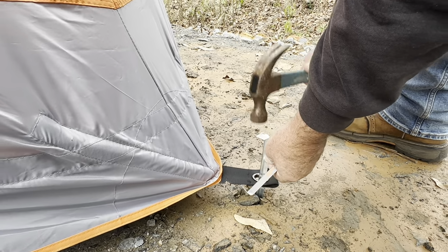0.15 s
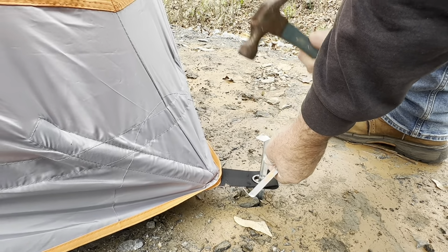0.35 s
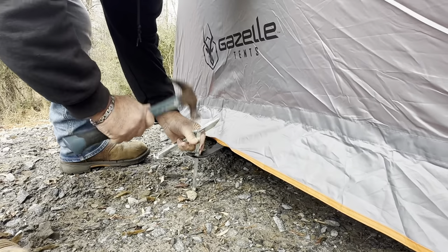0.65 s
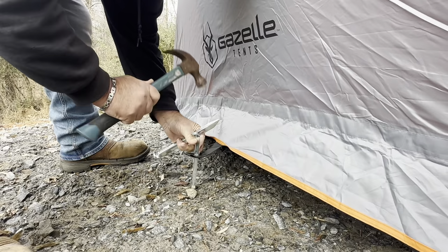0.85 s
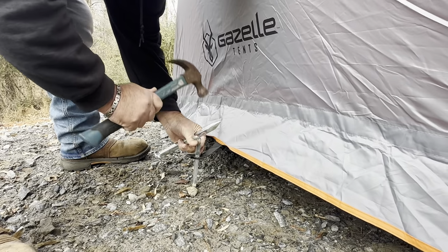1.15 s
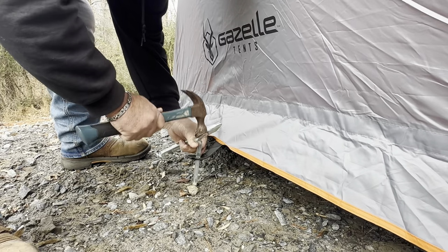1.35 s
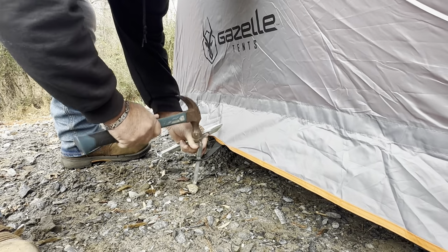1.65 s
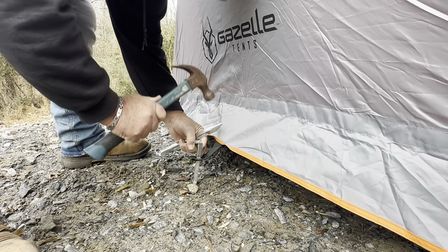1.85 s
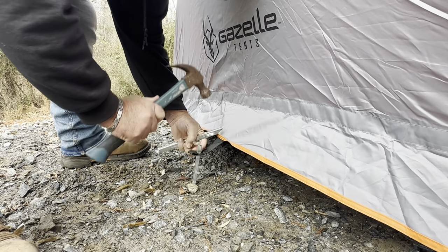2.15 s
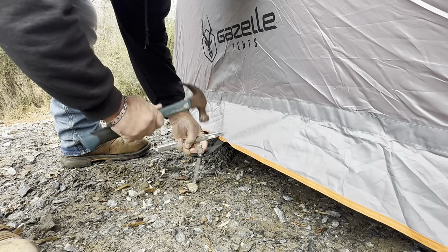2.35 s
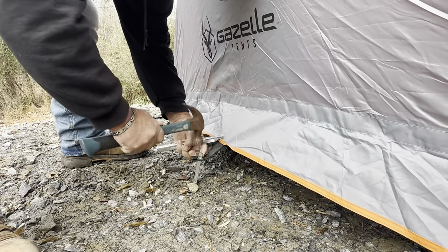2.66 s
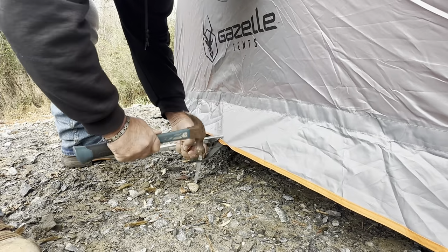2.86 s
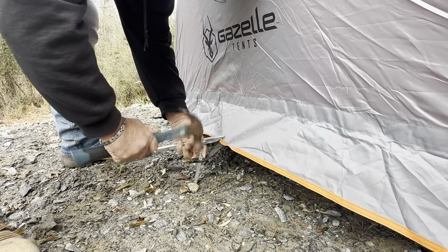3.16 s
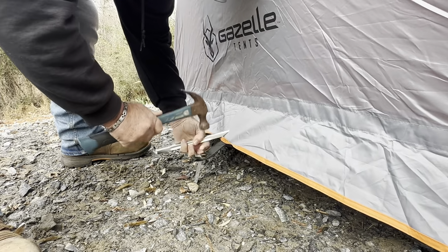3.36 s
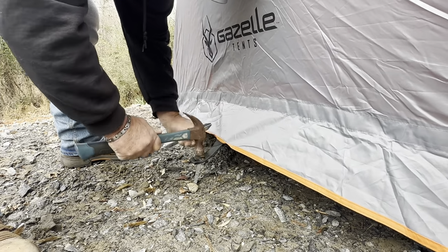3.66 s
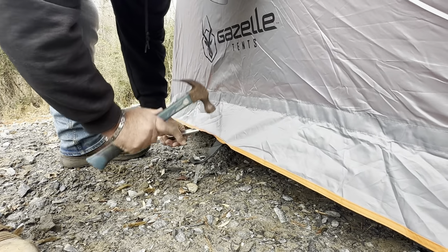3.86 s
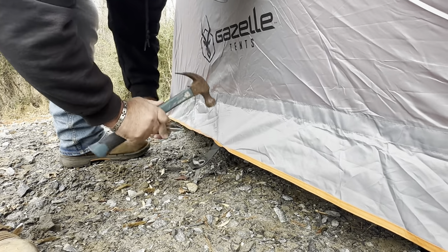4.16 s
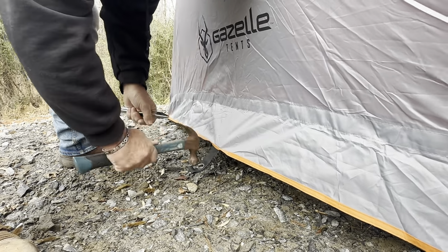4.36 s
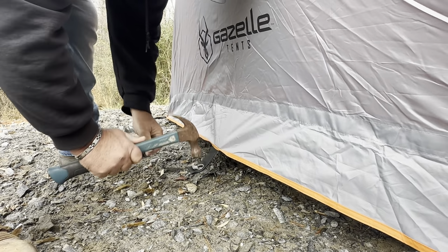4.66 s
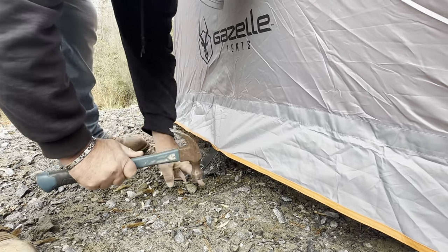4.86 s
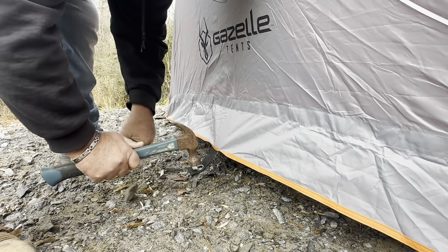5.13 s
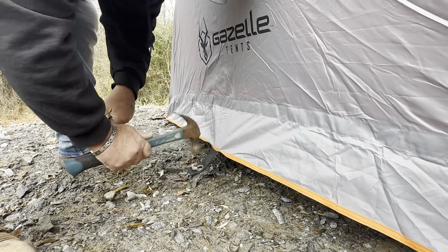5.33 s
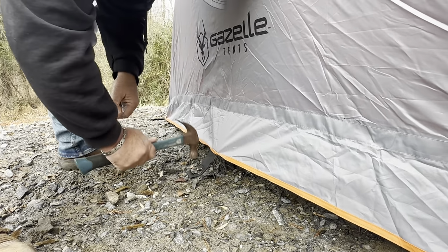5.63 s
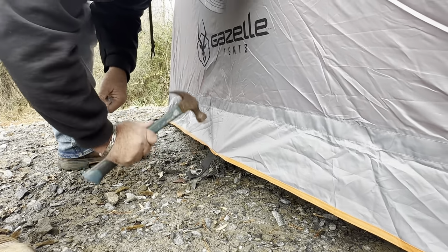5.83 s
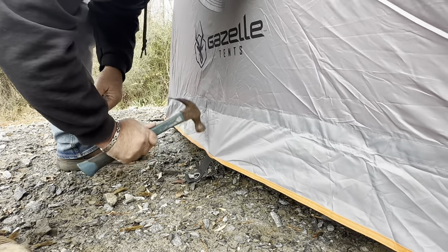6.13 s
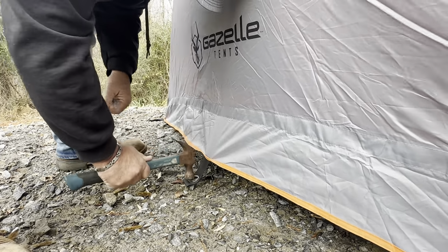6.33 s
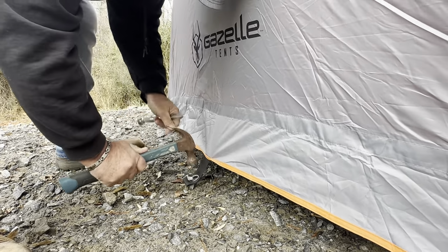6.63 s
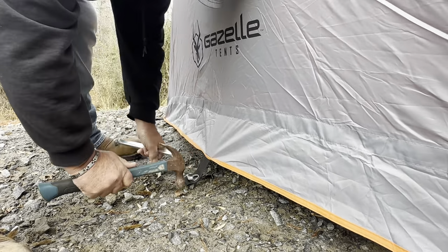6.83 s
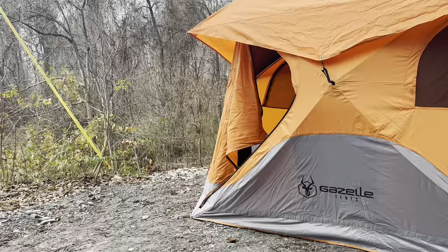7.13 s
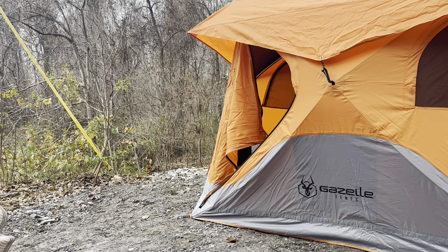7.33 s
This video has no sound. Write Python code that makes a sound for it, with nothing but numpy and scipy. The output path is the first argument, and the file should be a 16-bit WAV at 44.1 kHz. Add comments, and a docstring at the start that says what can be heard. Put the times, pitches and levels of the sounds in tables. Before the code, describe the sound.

Outdoors, very close to the ground, with quiet open air and a faint distant road rumble throughout. A hammer cracks onto a steel stake at 0.0 s, followed by a tiny dropout near 0.4 s as the next blow lands. Sharp, bright clanks continue about every 0.3 s until 3.2 s, varying in pitch and force, strongest near 1.0 and 1.9 s, each with brief ringing steel and a short grainy reflection. Slightly slower blows at 3.6, 3.9 and 4.3 s bring more low thud. Hammering pauses; around 4.9 to 5.3 s there are faint scrapes and gravel ticks, one crisp at 5.1 s. Three heavier blows at 5.5, 5.9 and 6.3 s combine clank with deep soil thump. Their tails fade, a brief dip comes at 6.9 s, then soft fabric hiss, a dull stone knock at 7.3 s and a low engine-like drone to 7.5 s.

```python
"""Driving a tent stake

Close by, outdoors, a claw hammer drives a steel stake into gravel beside a two-port microphone.
Each blow is a noisy crack with damped sines, ringing steel, a noise tail back off tent and trees,
and a slow falling swing through the soil. Gravel ticks are resonant noise bursts, scrapes snapping hiss.
Shaped noise makes the distant road; near the end fabric hisses in the wind over a low droning sine."""
import sys
import numpy as np
from scipy import signal
from scipy.fft import rfft, irfft
from scipy.io import wavfile
from scipy.ndimage import uniform_filter1d

SR = 44100
rng = np.random.default_rng(int(sys.argv[2]) if len(sys.argv) > 2 else 0)


def dump_mix(stems):
    """Bounce the given channels to the path in sys.argv[1] as a 16-bit WAV at rate SR."""
    frames = np.atleast_2d(stems).T  # one column per channel
    limited = np.clip(frames, -1, 1)  # hard clip at full scale
    pcm = np.round(limited * 32767).astype(np.int16)
    wavfile.write(sys.argv[1], SR, pcm)


N = 330305

# Levels are those in the mix, ahead of record().
# Far road and open air. Each row: frequency in Hz, relative density in dB per Hz.
AIR_COLOUR = [(20, -45), (40, -16), (72, -1.5), (156, -22), (237, -22.5), (297, -26), (465, -23),
              (994, -22), (2300, -35), (3300, -45.5), (7000, -46.5), (7800, -51.5), (15600, -65.5),
              (16000, -91.5)]
# Loudness of the air. Each row: time in seconds, level in dB.
AIR_LEVEL = [(0.0, -51), (7.49, -48.5)]
# Likeness of the air at the two ports. Each row: frequency in Hz, likeness from -1 to 1.
AIR_LIKENESS = [(60, .95), (150, .91), (380, .15), (950, -.3), (2400, -.35), (6000, 0), (15000, .45)]

# Hammer blows. Each row: start in seconds, crack level in dB, loudest clang in Hz, clang in dB and
# treble in dB (both relative to the crack), soil thud in dB, head ring in dB, lingering band in Hz.
BLOWS = [(0.0054, -16.5, 4500, 0.5, -0.5, -18.5, -40.5, 4650),
         (0.388, -18, 5360, -4.5, -2.5, -27, -46, 3250), (0.6758, -17.5, 3635, -5, 2.5, -29.5, -54, 3630),
         (0.975, -13.5, 3117, -1, -1, -32, -52.5, 3090), (1.269, -16, 5600, -3.5, 0, -32, -46.5, 2980),
         (1.577, -16.5, 5440, -4, 4, -29, -46, 3400), (1.9318, -12.5, 4080, -3.5, -0.5, -31.5, -46.5, 3460),
         (2.2256, -16.5, 4200, -3.5, -0.5, -30, -48.5, 4250),
         (2.539, -18.5, 5030, -0.5, 6, -31, -47.5, 2940), (2.863, -15, 5550, -1.5, 0, -32, -49, 3520),
         (3.1726, -19.5, 5570, 1.5, 6.5, -34, -49.5, 3470),
         (3.5775, -18, 5800, 5, -1.5, -28.5, -51.5, 5540), (3.923, -16, 4610, -3, 2, -17.5, -54.5, 4530),
         (4.2894, -17.5, 3370, 1.5, 3.5, -15, -44.5, 4900), (5.5107, -15, 5560, -4, -5, -16, -48, 5520),
         (5.9, -17, 3060, -10, 1, -11.5, -42, 1660), (6.2742, -17.5, 4300, 3, 1.5, -10, -44, 1686)]
# Noise of the steel contact. Each row: frequency in Hz, relative density in dB per Hz.
CRACK_COLOUR = [(500, -28.5), (1700, -12), (2900, 1), (3900, 0.5), (4700, -6), (5600, -7.5), (7500, -6.5),
                (9800, -5.5), (11400, -3.5), (12200, -13.5), (15400, -4.5), (16200, -15)]
# Hand-damped modes of the contact. Each row: frequency in Hz, relative level in dB, t60 in seconds.
CLANG_MODES = [(2070, -18.5, 0.032), (3220, -11, 0.082), (4640, -4.5, 0.023), (5120, -13, 0.046),
               (6700, -13.5, 0.036), (6900, -12.5, 0.098), (7160, -14, 0.014), (8200, -20, 0.047),
               (10660, -4.5, 0.014), (10800, -3, 0.0052), (12400, -24, 0.022), (13980, -17, 0.011)]
# Hammer head, a close pair that beats, and the claw's short ping.
# Each row: frequency in Hz, relative level in dB, t60 in seconds.
HEAD_MODES = [(6515, -1, 0.45), (6508, -8, .45), (4265, 12, .07)]
# Ringing stake. Each row: frequency in Hz, relative level in dB, t60 in seconds.
STAKE_MODES = [(1426, -3.5, 0.43), (2340, -3.5, 0.15), (3500, -4, 0.23), (4330, 2, 0.48),
               (5230, -1.5, 0.18), (5060, -11.5, 0.55), (8100, -18.5, 0.28), (10100, -15.5, 0.43)]
# Colour of the way back from tent, ground and trees. Each row: frequency in Hz, relative level in dB.
SCATTER_COLOUR = [(400, -8), (1200, 0), (2000, 6.5), (3000, -0.5), (5600, -1.5), (7000, -3), (10000, -8.5),
                  (15000, -11.5)]
# Fading of the way back. Each row: frequency in Hz, t60 in seconds.
SCATTER_T60 = [(300, 0.66), (1500, 0.26), (3000, 0.41), (6000, 0.42), (10000, 0.41), (16000, 0.12)]
# The soil after a blow. Each row: frequency in Hz, relative density in dB per Hz.
RUMBLE_COLOUR = [(30, -12.5), (70, 5), (130, 2), (250, -10.5), (500, -20.5), (1000, -28), (2500, -62.5),
                 (6000, -92.5)]
# Port phase for sound from the stake. Each row: frequency in Hz, radians by which left leads.
PORT_PHASE = [(0, 0), (1700, 2.9), (3500, 3.1), (4000, 4.2), (6000, 5.2), (7300, 9.2), (8200, 8.3),
              (9000, 6.6), (9500, 7.4), (11500, 6.5), (16500, 3.9)]
# Port balance for sound from the stake. Each row: frequency in Hz, left over right in dB about the pan.
PORT_BALANCE = [(500, 0), (1200, 1), (2800, -1.5), (5500, 3.5), (9500, -3), (14000, -1.5)]

# Gravel ticks. Each row: start in seconds, level in dB, centre in Hz, pan in dB to the left.
TICKS = [(1.6144, -32.5, 7200, 3), (3.2294, -61, 6520, 7), (4.2243, -54, 3820, 4), (4.9541, -40.5, 7150, 2),
         (5.0, -35.5, 7460, 1), (5.0888, -22.5, 9900, 1.5), (5.1344, -59, 9870, 1.5),
         (5.1542, -52, 10100, 6), (5.2205, -47, 3660, 7), (5.2629, -37, 3630, 16.5), (5.296, -54, 3980, 8),
         (5.3444, -54.5, 4150, 16), (5.975, -46, 2990, 1), (6.045, -58, 5000, 3), (6.222, -59, 4500, 2),
         (7.2194, -59, 4690, 4), (7.3282, -49, 9540, 5)]
# Dull knocks. Each row: start in seconds, level in dB, centre in Hz, pan in dB to the left.
KNOCKS = [(3.19, -31, 170, 1), (5.088, -41, 600, 7), (5.15, -43.5, 170, 1), (5.262, -39, 350, 3),
          (7.174, -43, 720, 10), (7.282, -25.5, 620, 7), (7.309, -41, 762, 3)]
# Hiss of scrapes and fabric. Each row: frequency in Hz, relative density in dB per Hz.
RUSTLE_COLOUR = [(1470, -3), (2500, -1.5), (4480, -4), (5730, -8), (6500, -3), (8430, -5.5), (9650, -1.5),
                 (14800, -12.5), (16100, -5), (16500, -57)]
# A boot scrapes the gravel. Each row: start in seconds, swell in seconds, hold in seconds, level in dB.
SCRAPES = [(3.216, .004, 0.2, -68), (4.913, 0.045, 0.031, -53.5), (5.087, 0.0057, 0.0033, -45.5)]
# Wind shakes the tent. Each row: time in seconds, level in dB.
FABRIC = [(6.915, -65.5), (6.937, -57), (7.089, -59.5), (7.279, -55.5), (7.49, -66)]
# Brief dips in the level. Each row: centre in seconds, half width in seconds.
DIPS = [(0.41, 0.029), (6.907, 0.027)]

DEEP_DB = -10  # thud level of a blow on the sunk stake
KNOCK_DB, KNOCK_FOLLOWS = -12.5, 0.61  # level at a deep blow, dB per dB of thud
KNOCK_HZ = 1560
SCATTER_DB, SCATTER_FOLLOWS = -42.5, 0.1  # level at a deep blow, dB per dB of thud
LINGER_DB, LINGER_WIDTH_HZ = 8, 140
THUD_DELAY_S, THUD_HASTE = .014, 0.00017  # delay at a deep blow, s sooner per dB of thud
STAKE_RING_DB = -45  # relative to the crack
STAKE_PAN_DB = 0.3

TICK_WIDTH_HZ, TICK_T60_S = 1530, 0.022
KNOCK_WIDTH_HZ, KNOCK_T60_S = 820, 0.053
BODY_HZ, BODY_DB = 3790, -5.5  # stony body under the ticks centred above 3.8 kHz
MIN_CYCLES = 28  # the t60 of low knocks is stretched to this many cycles
SCRAPE_FADE_S = 0.045
DRONE_S, DRONE_SWELL_S, DRONE_DB, DRONE_HZ = 7.08, 0.15, -43, 58.5
DRONE_WAVER_DB, DRONE_WAVER_HZ, DRONE_WAVERS_PER_S = 1.5, .6, 9
EDGE_HZ = 16400  # upper band limit


def amp(db):
    """Amplitude factor of a level in dB."""
    return 10 ** (np.asarray(db) / 20)


def evened(x):
    """Scale to an rms of one."""
    return x / np.sqrt(np.mean(x ** 2) + 1e-20)


def read(points, hz):
    """Read a frequency table along a logarithmic axis."""
    f, value = np.transpose(points)
    return np.interp(np.log(hz + 1), np.log(f + 1), value)


def add(mix, s, sound):
    """Mix a sound in at s seconds, cut off at the end of the mix."""
    part = mix[..., round(s * SR):][..., :sound.shape[-1]]
    part += sound[..., :part.shape[-1]]


def panned(x, pan_db):
    """Left over right by pan_db."""
    return x * amp([[pan_db / 2], [-pan_db / 2]])


def coloured(x, db):
    """Filter by a level curve in dB over Hz."""
    hz = np.fft.rfftfreq(x.shape[-1], 1 / SR)
    return irfft(rfft(x) * amp(db(hz)), x.shape[-1])


def rings(modes, t, detune, spread_db):
    """Dying sines with fresh phases; every blow lands a little differently."""
    hz, db, t60 = np.transpose(modes)[:, :, None]
    lift, shift, phase = rng.random((3, len(hz), 1))
    level = amp(db + spread_db * lift - 60 * t / t60)
    turns = hz * (1 + detune * (shift - .5)) * t + phase
    return (level * np.sin(2 * np.pi * turns)).sum(0)


def field(gain, likeness, phase, size):
    """Stereo noise from a gain map over Hz and s, with likeness and phase between the ports."""
    hop = size // 4
    frames, hz = N // hop + 5, np.fft.rfftfreq(size, 1 / SR)
    a, b, c, d = rng.standard_normal((frames, len(hz), 4)).T
    same = np.clip(likeness(hz), -1, 1)[:, None]
    left, other = a + 1j * b, c + 1j * d
    right = same * left * np.exp(-1j * phase(hz))[:, None] + np.sqrt(1 - same ** 2) * other
    spectra = np.array([left, right]) * gain(hz[:, None], np.arange(frames) * hop / SR)
    return signal.istft(spectra, nperseg=size, noverlap=size - hop)[1][:, :N]


def air():
    """Far road rumble and open-air wash: shaped noise in drifting patches of time and pitch."""
    def gain(hz, t):
        grain = rng.standard_normal((len(t), len(hz))).T
        patches = evened(uniform_filter1d(uniform_filter1d(grain, 6, 0), 8, 1))
        return amp(read(AIR_COLOUR, hz) + 2.0 * patches)
    wash = evened(field(gain, lambda f: read(AIR_LIKENESS, f), lambda f: 0 * f, size=2048))
    return wash * amp(np.interp(np.arange(N) / SR, *np.transpose(AIR_LEVEL)))


def crack(clang_hz, clang_db, treble_db):
    """A few milliseconds of chattering steel contact, one clang standing out, and damped modes."""
    t = np.arange(2048) / SR
    middle, bright, side = rng.standard_normal((3, len(t)))
    # below the treble each port hears its own near reflections
    ports_noise = middle + .5 * side * np.array([[1], [-1]])
    body = coloured(ports_noise, lambda f: read(CRACK_COLOUR, f) - 40 * (f > 7600))
    treble = coloured(bright, lambda f: read(CRACK_COLOUR, f) - 40 * (f < 7600))
    hold = np.minimum(t / 0.0022, 1) * amp(-60 * np.maximum(t - .004, 0) / 0.011)
    chatter = (evened(body) + amp(treble_db) * evened(treble) * amp(-60 * t / 0.05)) * hold
    clang = np.sin(2 * np.pi * clang_hz * t) * (t / .0025) * np.exp(1 - t / 0.002)
    damped = rings(CLANG_MODES, t, detune=0.029, spread_db=7) * np.minimum(t / 0.003, 1)
    return 1.17 * chatter + amp(clang_db) * clang + 0.24 * damped


def knock():
    """The dull knock of the stake biting into the gravel: noise falling 9 dB per octave off its centre."""
    t = np.arange(2048) / SR
    noise = rng.standard_normal(len(t))
    dull = coloured(noise, lambda f: -9 * abs(np.log2(f / KNOCK_HZ + 0.0085)))
    return evened(dull) * np.minimum(t / 0.0018, 1) * amp(-60 * t / 0.03)


def scatter(sound, linger_hz):
    """Tent wall, ground and trees return the crack as a grainy tail with its colour; one band lingers."""
    a, b = rng.standard_normal((2, SR // 2))
    hz, t, grains = signal.stft(np.array([a, .5 * a + 0.97 * b]), SR, nperseg=256)
    colour = np.sqrt(signal.welch(sound, SR, nperseg=128, nfft=256)[1])[:, None]
    band = np.exp(-((hz[:, None] - linger_hz) / LINGER_WIDTH_HZ) ** 2)
    linger = LINGER_DB * band * np.minimum(t / 0.02, 1)
    lumps = 0.73 * rng.standard_normal(len(t))  # single reflectors stand out
    early = 1 + 5.4 * np.exp(-t / 0.016)
    decay = -60 * t / read(SCATTER_T60, hz)[:, None]
    fading = amp(read(SCATTER_COLOUR, hz)[:, None] + linger + lumps + decay)
    tail = signal.istft(grains * colour * early * fading, SR, nperseg=256)[1]
    tail = tail * np.minimum(np.arange(tail.shape[1]) / SR / 0.0081, 1)
    return tail / np.std(tail[:, round(.025 * SR):round(.07 * SR)])


def thud(delay_s):
    """The soil spreads the blow: fast high ripples first, one big slow swing after, and a ragged rumble."""
    t = np.arange(round(.3 * SR)) / SR
    ripple_phase = 2 * np.pi * rng.random()
    ripples = np.sin(2 * np.pi * 370 * t + ripple_phase) * np.exp(-((t - .0055) / 0.0017) ** 2)
    u = t - delay_s
    hz = 48 + 105 * np.exp(-np.maximum(u + 0.00059, 0) / 0.0045)  # long waves travel slower
    turns = np.cumsum(hz) / SR
    swell = np.exp(-(u / np.where(u < 0, .005, .013)) ** 2)
    swing = np.cos(2 * np.pi * (turns - np.interp(0, u, turns))) * swell
    middle, side = coloured(rng.standard_normal((2, len(t))), lambda f: read(RUMBLE_COLOUR, f))
    rumble = evened(middle + 0.1 * side * np.array([[1], [-1]]))
    fading = np.minimum(t / 0.0084, 1) * amp(-60 * t / 0.32)
    return panned(swing + 0.55 * ripples, 2.8) + 0.39 * rumble * fading


def ports(x):
    """Phase and level offset between the two microphone ports for sound from the stake."""
    hz = np.fft.rfftfreq(512, 1 / SR)
    phase = np.interp(hz, *np.transpose(PORT_PHASE))
    half = amp(read(PORT_BALANCE, hz) / 2) * np.exp(.5j * phase)  # each port takes half the offset
    taps = np.fft.fftshift(irfft([half, 1 / half]), 1) * np.hanning(512)
    return signal.oaconvolve(x, taps, axes=1)[:, 256:][:, :N]


def hammer():
    """Crack, rings and scatter reach both ports from one side; the thud comes up through the stand."""
    near, soil = np.zeros((2, N)), np.zeros((2, N))
    t = np.arange(SR // 2) / SR
    for s, db, *contact, thud_db, head_db, linger_hz in BLOWS:
        depth_db = thud_db - DEEP_DB  # knock and scatter grow with the thud
        knock_db = KNOCK_DB + KNOCK_FOLLOWS * depth_db
        hit = amp(db) * crack(*contact) + amp(knock_db) * knock()
        add(near, s, panned(hit, STAKE_PAN_DB))
        scatter_db = SCATTER_DB + SCATTER_FOLLOWS * depth_db
        add(near, s + 0.0028, amp(scatter_db) * scatter(hit[0, :320], linger_hz))
        head = amp(head_db) * rings(HEAD_MODES, t, detune=0.00085, spread_db=3.5)
        stake = amp(db + STAKE_RING_DB) * rings(STAKE_MODES, t, detune=.012, spread_db=9)
        add(near, s, panned(head + stake, STAKE_PAN_DB))
        add(soil, s, amp(thud_db) * thud(THUD_DELAY_S - THUD_HASTE * depth_db))
    return ports(near) + soil


def stone(hz, width_hz, t60, t):
    """A short noise burst in a broad resonance; centred above 3.8 kHz it has a stony body below."""
    def peak(f, centre):
        return -16 * np.log10(1 + (2 * (f - centre) / min(width_hz, hz)) ** 2)

    def resonance(f):
        return np.maximum(peak(f, hz), BODY_DB + peak(f, min(hz, BODY_HZ)))
    burst = evened(coloured(rng.standard_normal(len(t)), resonance))
    return burst * amp(-60 * t / max(t60, MIN_CYCLES / hz)) * np.minimum(hz * t / 5, 1)


def gravel():
    """Ticks and dull knocks of stones near the stake, each a resonant burst placed by its pan."""
    out, t = np.zeros((2, N)), np.arange(8192) / SR
    ticks, knocks = (TICKS, TICK_WIDTH_HZ, TICK_T60_S), (KNOCKS, KNOCK_WIDTH_HZ, KNOCK_T60_S)
    for rows, width_hz, t60 in (ticks, knocks):
        for s, db, hz, pan_db in rows:
            add(out, s, panned(amp(db) * stone(hz, width_hz, t60, t), pan_db))
    return ports(out)


def rustle():
    """Boot scrapes and shaken fabric: hiss with many small snaps, flickering across the whole treble."""
    def gain(hz, t):
        snaps_db = 2.4 * rng.exponential(size=len(t))
        return amp(read(RUSTLE_COLOUR, hz) + snaps_db)
    hiss = evened(field(gain, lambda f: 0.33 + 0 * f, lambda f: 0 * f, size=128))
    t = np.arange(N) / SR
    scrapes = np.zeros(N)
    for s, swell, hold, db in SCRAPES:
        corners = np.cumsum([0, swell, hold, SCRAPE_FADE_S])
        scrapes += amp(db) * np.interp(t - s, corners, [0, 1, 1, 0])
    s, db = np.transpose(FABRIC)
    fabric = np.interp(t, s, amp(db), 0)
    return hiss * (scrapes + fabric)


def drone():
    """A low sine, slightly uneven in pitch and level, swells up like a far engine."""
    t = np.arange(N) / SR
    knots = np.arange(0, N / SR + 1, 1 / DRONE_WAVERS_PER_S)
    drift = rng.standard_normal((2, len(knots)))
    pitch, level = (np.interp(t, knots, values) for values in drift)
    tone = np.sin(2 * np.pi * np.cumsum(DRONE_HZ + DRONE_WAVER_HZ * pitch) / SR)
    swell = np.clip((t - DRONE_S) / DRONE_SWELL_S, 0, 1)
    return np.sqrt(2) * tone * amp(DRONE_DB + DRONE_WAVER_DB * level) * swell


def scene():
    """All layers as they meet at the microphone."""
    return air() + hammer() + gravel() + rustle() + drone()


def record(dry):
    """Two brief level dips, bass roll-off, soft overload, then the band limit."""
    t = np.arange(N) / SR
    for s, half in DIPS:
        dry = dry * np.clip(abs(t - s) / half, .03, 1)
    dry = signal.lfilter(*signal.butter(2, 35, "high", fs=SR), dry)
    dry = np.tanh(dry * 0.78) / 0.62
    low_pass = signal.firwin(255, EDGE_HZ, window=("kaiser", 9), fs=SR)
    return signal.oaconvolve(dry, low_pass[None], "same")


dry = scene()
out = record(dry)
dump_mix(out)
```